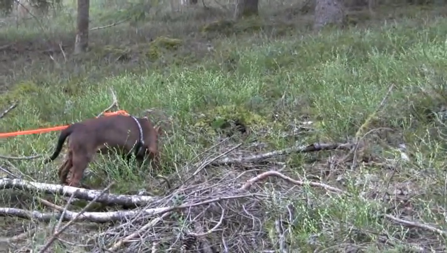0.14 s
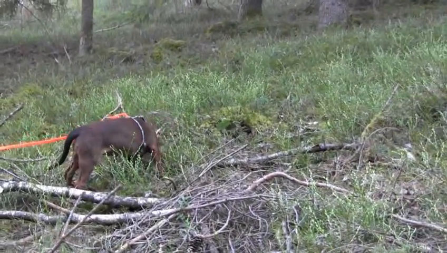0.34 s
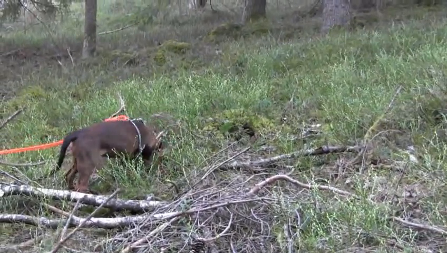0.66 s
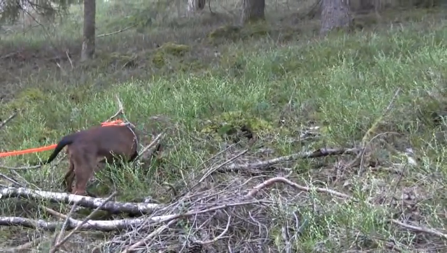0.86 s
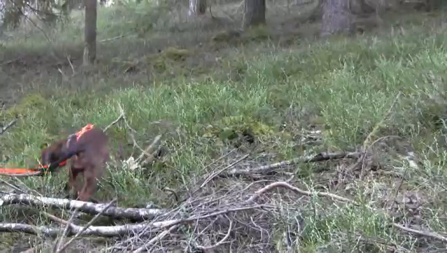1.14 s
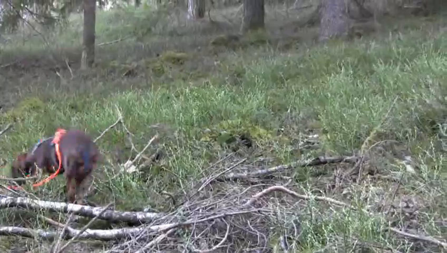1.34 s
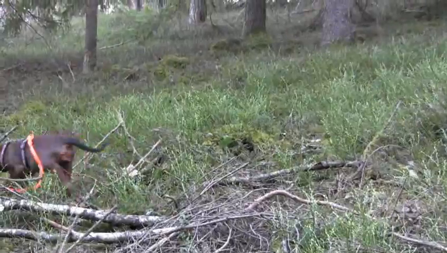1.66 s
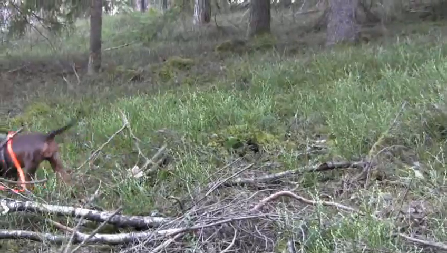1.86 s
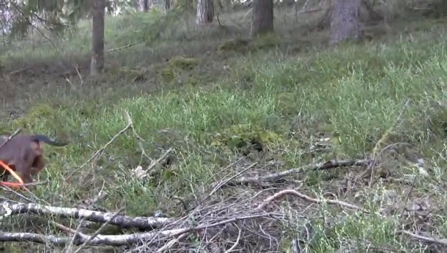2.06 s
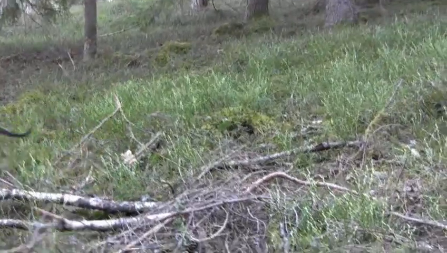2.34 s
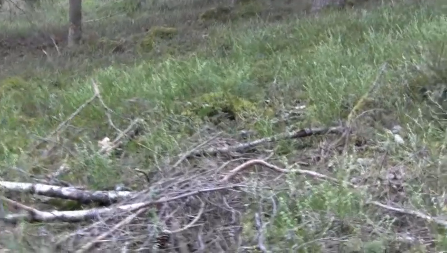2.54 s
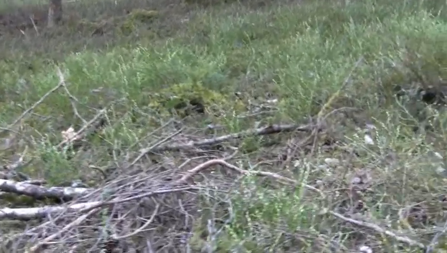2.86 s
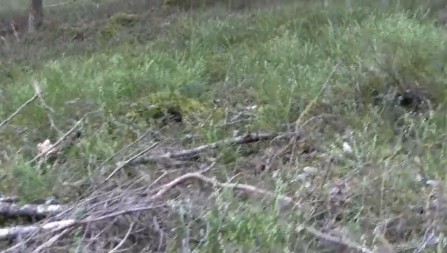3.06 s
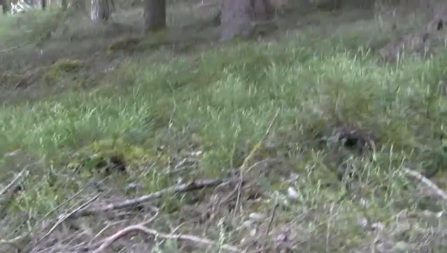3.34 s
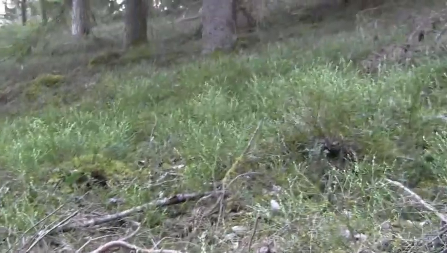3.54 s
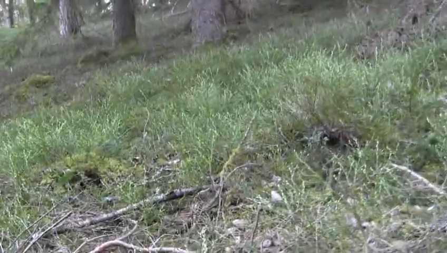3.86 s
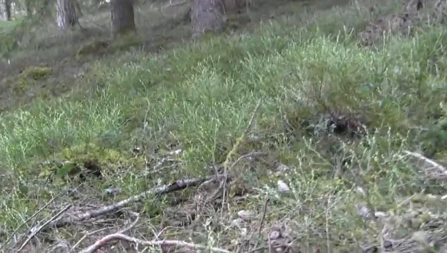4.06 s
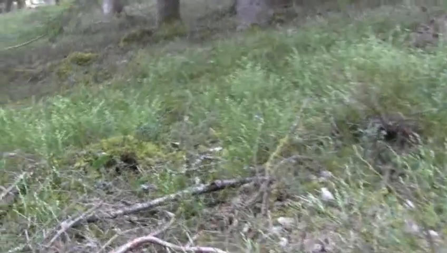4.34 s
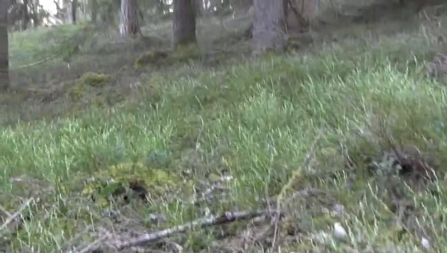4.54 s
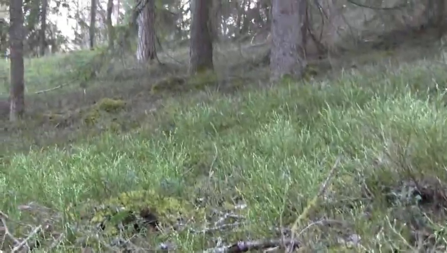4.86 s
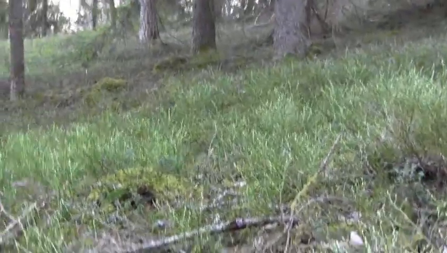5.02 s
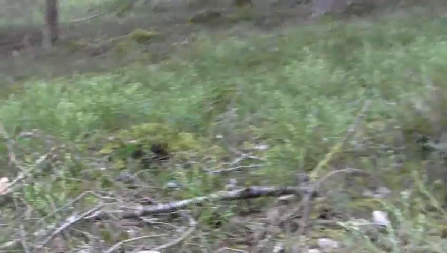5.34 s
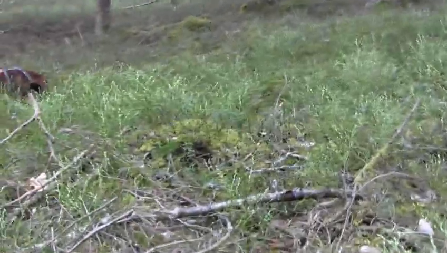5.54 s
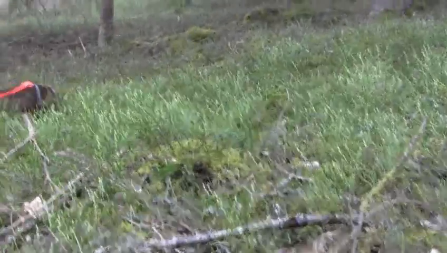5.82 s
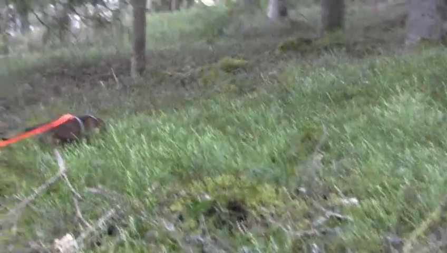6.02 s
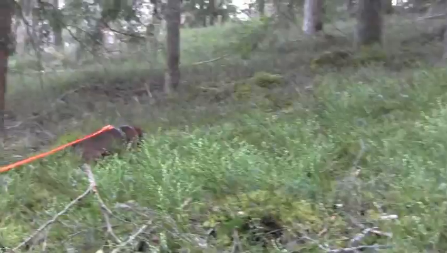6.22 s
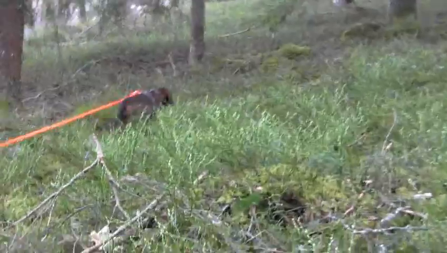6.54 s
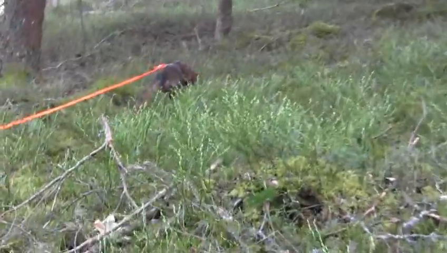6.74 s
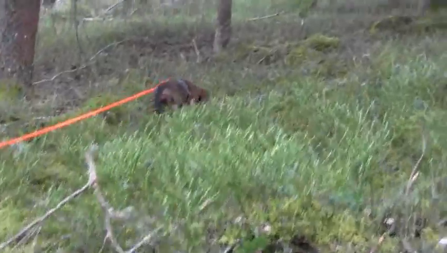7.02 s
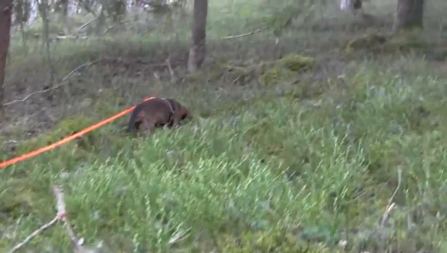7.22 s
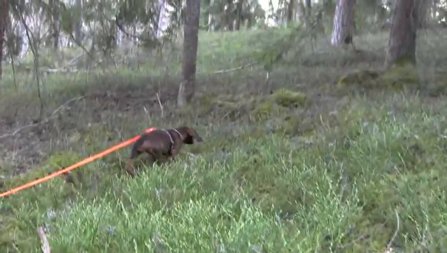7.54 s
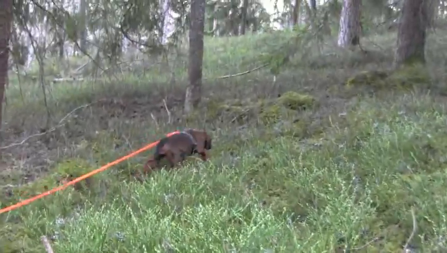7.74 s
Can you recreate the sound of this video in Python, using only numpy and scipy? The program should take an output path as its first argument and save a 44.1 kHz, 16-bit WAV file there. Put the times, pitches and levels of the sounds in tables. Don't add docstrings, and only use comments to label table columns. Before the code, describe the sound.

A dry, close outdoor stereo pickup in still woods with soft air hiss. From 0 to 0.5 s, a dog pushes gently through grass: soft swishes, small dull knocks, faint whistling whisks of the lead and a short rip. From 0.5 to 2 s it is very quiet, with a faint distant road hum and tiny dry ticks. At 2-2.9 s steps begin, with brush swishing and twigs snapping, a sharp crack at 2.58. Sparse rustles follow, then a firm crack and crunch at 3.6. From 4 to 5.4 s snaps thicken, strongest around 4.55-4.8, with a brushy crunch at 5.06. More cracks come at 5.75-5.9, then a heavy splintering crunch at 6.06-6.13. Dense bright crackling runs 6.5-7.15, peaking near 6.9. It thins briefly, then a hard snap at 7.7 and rustling crackles close it. Low handling bumps recur.

```python
import sys
import numpy as np
from scipy import signal
from scipy.fft import rfft, irfft, next_fast_len
from scipy.io import wavfile
from scipy.ndimage import uniform_filter1d

SR = 44100
rng = np.random.default_rng(int(sys.argv[2]) if len(sys.argv) > 2 else 0)


def voltage_ratio(decibels):
    exponent = np.asarray(decibels, float) / 20
    return 10 ** exponent


def generate_wav(signal):
    frames = np.transpose(np.atleast_2d(signal))
    scaled = np.clip(frames, -1, 1) * 32767
    pcm = np.round(scaled).astype(np.int16)
    wavfile.write(sys.argv[1], SR, pcm)


N = 347830


def snap(energy_db, ring_hz, edge_db, knock_db, tear_ms):
    t = np.arange(2048) / SR
    tear_s = np.clip(tear_ms, .15, 14) / 1000
    fibres = rng.standard_normal(2048) * np.minimum(t / .0003, 1) * np.exp(-t / tear_s)
    fibres[12] -= 1.1
    fibres += 0.034 * rng.standard_normal(2048) * np.exp(-t / 0.0038)

    top_hz = np.clip(7500 * voltage_ratio(0.1 * (edge_db + 1.5)), 3000, 8500)
    body = signal.sosfilt(signal.butter(2, [1000, top_hz], "band", fs=SR, output="sos"), fibres)
    edge = signal.sosfilt(signal.butter(2, [6300, 12800], "band", fs=SR, output="sos"), fibres)
    mode = np.exp(-t * ring_hz / 1.18) * np.sin(2 * np.pi * ring_hz * t)
    ring = signal.oaconvolve(fibres, mode)[:2048]

    knock_hz = 280 * 1.53 ** rng.random()
    knock = np.sin(2 * np.pi * knock_hz * t) * np.exp(-t * knock_hz / 0.33)
    knock *= np.minimum(t / 0.00061, 1)
    knock = signal.sosfilt(signal.butter(3, 150, "high", fs=SR, output="sos"), knock)

    sound = evened(evened(body) + 1.6 * evened(ring))
    sound = sound + voltage_ratio(edge_db) * evened(edge) + voltage_ratio(knock_db) * evened(knock)
    lag = np.clip(2.0 * rng.standard_normal(), -.75, .75)
    return voltage_ratio(energy_db) / np.sqrt(2048) * ports(np.roll(sound, 2), lag, 0.48)


def crunch(energy_db, ring_hz, cycles):
    t = np.arange(2048) / SR
    ring = np.sin(2 * np.pi * ring_hz * t) * np.exp(-t * ring_hz / cycles) * np.minimum(t / 0.00081, 1)
    return voltage_ratio(energy_db) * ring / np.linalg.norm(ring)


# (time [s], energy [dB], ring [Hz], sharp edge [dB])
CLEAN_BREAKS = [(.2486, -34, 3300, -20), (.312, -29, 2570, -33), (1.5834, -33, 4430, -1.5),
                (2.6516, -24.5, 2200, -29), (2.7732, -20, 1010, -18), (2.8278, -19.5, 5550, 0),
                (3.6113, -27, 4450, -24), (4.2843, -24, 2660, -16), (4.308, -20.5, 2850, -19),
                (4.5466, -14.5, 3460, -25), (4.7791, -10.5, 1590, -2.5), (4.783, -17, 2650, -14),
                (5.0790, -16.5, 2330, -15), (5.088, -21, 1230, -15), (5.2587, -27, 2110, -3),
                (5.2935, -21, 2000, -13), (5.361, -20.5, 7630, -3), (5.8204, -24, 6370, 6),
                (5.8257, -17.5, 3330, -27), (5.9071, -12.5, 960, -11), (6.48, -22, 4960, 7),
                (6.5286, -23, 2240, -5), (6.6112, -20.5, 5800, -5), (6.6675, -20.5, 5450, -6),
                (6.7282, -13.5, 5250, -6), (6.9079, -22, 5860, -20), (7.2568, -29, 2600, -23),
                (7.7033, -8, 6000, -18), (7.829, -20.5, 6070, -23)]
# (time [s], energy [dB], ring [Hz], sharp edge [dB])
SPLINTERS = [(2.3474, -26.5, 2220, -60), (2.547, -32, 5940, -9), (2.5784, -11.5, 5750, -15),
             (2.6822, -21, 1860, -19), (3.176, -26, 5900, 0), (3.2533, -31, 5160, 1),
             (3.3114, -31, 7940, -9), (3.9326, -24.5, 4360, -12), (4.0500, -19.5, 1880, -40),
             (4.1472, -21.5, 1700, -18), (4.7203, -18, 2930, -2.5), (5.3904, -25.5, 2000, -16),
             (5.604, -21, 2030, -39), (5.7493, -14, 6950, -12), (5.7756, -16, 6900, -16),
             (1.5555, -33, 8400, -8), (6.7901, -21.5, 5900, -1), (1.347, -34, 8100, -14),
             (6.88, -13, 2300, -23), (6.934, -14, 6140, -14), (7.645, -21.5, 6120, -3),
             (7.758, -23.5, 3700, -11), (7.7928, -30, 1490, 7), (7.839, -27, 4870, -22)]
# (time [s], energy [dB], ring [Hz], sharp edge [dB])
PRESSED = [(2.0294, -26, 2270, -30), (2.8619, -21, 1020, -19), (3.5042, -26, 3230, -26),
           (4.2798, -22, 4600, 2.5), (4.3717, -25.5, 2310, -10), (4.7764, -12, 7560, 2.5),
           (5.3262, -23.5, 2520, -15), (5.6275, -29, 1550, -12), (6.3412, -30, 4270, -6),
           (6.6836, -36, 7100, -6), (6.7176, -13.5, 4570, -1.5), (6.762, -20, 2120, -20),
           (6.8878, -15, 3200, -4), (6.8933, -7.5, 3180, -20), (7.155, -13, 3420, -5.5)]
# (time [s], energy [dB], ring [Hz], sharp edge [dB])
TRODDEN = [(2.7961, -16, 1990, -23), (3.594, -13.5, 4630, -7), (4.1346, -19.5, 960, -46),
           (4.139, -21, 4160, -21), (4.5698, -15, 1800, -7.5), (4.6652, -16, 6340, 0.5),
           (4.6939, -15, 2600, -2), (4.7652, -22.5, 6200, -9), (5.2218, -23, 4330, -3.5),
           (5.4675, -29, 4030, -6), (5.756, -16.5, 2840, -28), (5.7813, -18, 2800, -6),
           (6.0788, -22, 2940, -15), (7.0022, -18.5, 2920, -19), (7.046, -17.5, 910, -20),
           (7.0995, -20.5, 920, -16), (7.7151, -26, 5640, -9)]
# (time [s], energy [dB], ring [Hz], sharp edge [dB])
RIPS = [(.414, -26.5, 2000, -27), (.431, -27.5, 3070, -13), (1.396, -36.5, 6000, -8),
        (1.478, -30.5, 3500, -14), (1.455, -34.5, 3300, -16), (2.203, -25.5, 1500, -24),
        (2.258, -25, 1880, -17), (2.29, -30, 1300, -18), (3.33, -27, 2160, -44), (3.912, -25.5, 1850, -36),
        (4.967, -28, 2420, -28), (6.268, -20.5, 3100, -14), (7.635, -25, 5500, -8)]
# (time [s], energy [dB], ring [Hz])
CRUNCHES = [(.081, -36, 383), (.136, -36, 316), (2.5787, -13.5, 1470), (3.596, -12, 1330),
            (4.571, -16, 400), (4.6955, -17.5, 2520), (5.043, -19, 1930), (5.058, -24, 1050),
            (6.051, -23, 482), (6.060, -13.5, 715), (6.0628, -22, 720), (6.0692, -20, 1020),
            (6.0790, -15.5, 690), (6.082, -19, 386), (6.094, -20, 650), (6.102, -20, 700),
            (6.1265, -19.5, 696), (6.824, -20, 1150), (6.8937, -11, 6170), (7.1551, -15, 3470),
            (7.156, -18.5, 1180)]


def twigs():
    out = np.zeros((2, N + 2048))
    # (breaks, low knock [dB], tearing time [ms])
    kinds = [(CLEAN_BREAKS, -15.5, 0.69), (SPLINTERS, -33, 1.9), (PRESSED, -7, 0.33),
             (TRODDEN, -1.2, 1.74), (RIPS, -16.5, 9.5)]
    for breaks, knock_db, tear_ms in kinds:
        for s, *twig in breaks:
            place(out, s, snap(*twig, knock_db, tear_ms))
    for s, *wood in CRUNCHES:
        place(out, s, crunch(*wood, cycles=1.47))
    return out[:, :N]


def tick(energy_db, ring_hz):
    t = np.arange(2048) / SR
    fibres = .5 * rng.standard_normal(2048) * np.exp(-t / 0.00048)
    fibres[0] -= 1.3
    click = signal.sosfilt(signal.butter(2, [1800, 11000], "band", fs=SR, output="sos"), fibres)
    mode = np.exp(-t * ring_hz / 1.5) * np.sin(2 * np.pi * ring_hz * t)
    ring = signal.oaconvolve(fibres, mode)[:2048]
    sound = evened(0.63 * evened(click) + evened(ring))
    lag = np.clip(0.92 * rng.standard_normal(), -.75, .75)
    return voltage_ratio(energy_db) / np.sqrt(2048) * ports(np.roll(sound, 2), lag, 0.13)


# (time [s], energy [dB], ring [Hz])
KNOCKS = [(0.079, -37, 443), (0.1328, -30.5, 450), (0.3147, -36, 1950), (2.0299, -27, 2340),
          (2.174, -34, 600), (2.192, -32, 1490), (2.22, -31, 1160), (2.2267, -33, 1420), (2.281, -31, 1200),
          (2.296, -37, 1290), (2.314, -29, 1350), (2.329, -34, 1600), (2.337, -32, 450), (2.355, -35, 500),
          (2.385, -30, 730), (2.548, -33, 1200), (2.725, -36, 560), (2.781, -28, 1990), (2.9617, -34, 1500),
          (2.9959, -36, 1230), (3.176, -37, 1930), (3.255, -34, 1190), (3.5315, -30, 473),
          (3.621, -32, 1720), (3.6265, -33, 1530), (3.7781, -36, 1090), (4.0045, -23, 920),
          (4.1351, -28, 780), (4.2795, -31, 1740), (4.3715, -19.5, 1500), (4.7888, -31.0, 900),
          (4.829, -36, 1230), (4.998, -26, 1100), (5.032, -23, 1160), (5.0879, -34, 1300),
          (5.4219, -34.0, 1590), (5.6263, -27.5, 1770), (5.746, -35, 1870), (5.7807, -23, 1760),
          (5.796, -27.5, 1140), (6.2783, -25, 1440), (6.3869, -29, 1380), (6.5455, -28, 1440),
          (6.575, -31.5, 1340), (6.5967, -33, 1430), (6.667, -34, 2050), (6.6843, -30, 1770),
          (6.7207, -24, 1420), (7.059, -33.5, 2110), (7.0998, -29, 600), (7.117, -27, 1530),
          (7.345, -29, 796), (7.4079, -32.5, 790), (7.5186, -33, 690), (7.567, -33.0, 1270),
          (7.6219, -30.5, 1230), (7.7149, -26, 950), (7.8379, -29, 1550)]
# (time [s], energy [dB], ring [Hz])
OVERTONES = [(0.2493, -42, 5400), (2.5785, -12.5, 5100), (2.5794, -17, 6450), (5.9078, -18.5, 2400),
             (7.1553, -35, 1900), (2.7965, -36, 4760), (7.046, -27.5, 1490), (7.2568, -25, 2280),
             (2.579, -18, 7700), (2.7973, -32, 3200), (2.796, -20, 8330), (3.5946, -21, 6640),
             (4.139, -22.5, 1770), (4.28, -29.5, 1900), (4.373, -23.5, 735), (4.57, -16, 1870),
             (4.5704, -20, 7650), (4.6667, -23, 1830), (4.695, -27, 5300), (4.7208, -27, 6800),
             (4.778, -19, 5160), (4.7796, -15.5, 1830), (5.0616, -21, 5400), (5.2214, -31, 7050),
             (5.7554, -20.5, 7600), (5.7565, -23, 850), (5.907, -27, 9200), (6.719, -24, 1800),
             (6.8802, -21, 6170), (6.8815, -16, 1250), (7.0025, -25, 5960), (7.0027, -36, 3150),
             (7.1557, -24.5, 7160)]
# (time [s], energy [dB], ring [Hz])
TICKS = [(0.3162, -33.5, 3750), (0.4184, -28, 2520), (0.9048, -47.5, 3270), (1.087, -42, 8550),
         (1.359, -44, 9500), (1.425, -41, 9000), (1.57, -45, 9000), (1.6572, -36.5, 7400),
         (1.866, -41, 4200), (1.8826, -42, 2560), (2.035, -36.5, 4330), (2.2583, -32, 5770),
         (2.2822, -33, 5020), (2.4513, -34.5, 2860), (2.5484, -33, 7800), (2.7533, -32, 4930),
         (2.7961, -17, 3730), (3.2333, -38, 5880), (3.5184, -39, 2690), (3.5332, -28, 2800),
         (3.5437, -37.0, 2670), (3.9174, -28, 3270), (4.048, -25, 4260), (4.131, -35, 2070),
         (4.304, -29, 2820), (4.4914, -27.5, 7620), (4.5828, -20, 5100), (4.658, -31, 4480),
         (4.6655, -17.5, 6800), (4.7417, -28, 4290), (4.7808, -12.5, 11400), (4.8554, -27.5, 3160),
         (5.088, -22, 2480), (5.125, -32, 2860), (5.286, -29, 3980), (5.294, -22.5, 2880),
         (5.3657, -26, 3770), (5.3906, -30, 3320), (5.454, -30, 3500), (5.4744, -28, 3270),
         (5.566, -29, 4570), (6.2906, -35, 3540), (6.3442, -25, 6700), (6.5185, -28, 3010),
         (6.529, -21.5, 4890), (6.5949, -29, 2070), (6.6333, -25, 4540), (6.639, -22, 7150),
         (6.685, -23, 7040), (6.783, -26, 7540), (6.7902, -20.5, 2070), (6.8535, -26, 6400),
         (6.866, -21, 2710), (6.8794, -18, 6500), (7.002, -27, 2860), (7.0592, -32, 4570),
         (7.274, -35.5, 7110), (7.6164, -29, 5730), (7.661, -24.5, 6500), (7.7582, -22, 3340)]


def litter():
    out = np.zeros((2, N + 2048))
    for s, *stick in KNOCKS + OVERTONES:
        side_db = 1.2 * rng.standard_normal() * np.array([[1], [-1]])
        place(out, s, crunch(*stick, cycles=1.28) * voltage_ratio(side_db))
    for s, *stalk in TICKS:
        place(out, s, tick(*stalk))
    return out[:, :N]


# (frequency [Hz], level [dB])
STEMS = [(200, -38), (900, -4.5), (1400, -1.5), (3000, -2), (4500, -7.5), (6000, -11.5), (9000, -48.5),
         (14000, -79)]
# (frequency [Hz], level [dB])
TIPS = [(2000, -40.5), (4500, -1), (6500, 8), (9000, 6), (12800, 2), (14000, 5), (16500, -15)]
# (frequency [Hz], level [dB])
GROUND = [(50, -40.5), (130, -3), (220, 2.5), (500, 5), (900, 7), (3000, -45.5)]
# (time [s], peak [dB], rise [s], fall [s], dry tips [dB])
NOSING = [
    (.035, -67, .008, .2, 0),
    (.2, -61, .3, .3, -18),
    (.425, -57, .03, .11, -8),
    (1.09, -72, .02, .3, -1),
    (1.2, -70, .06, .2, -1),
    (1.477, -66, .06, .3, -4),
    (2.023, -66, .2, .06, -3),
]
# (time [s], peak [dB], rise [s], fall [s], dry tips [dB])
SWEEPS = [(2.171, -58.5, 0.053, 0.15, -7), (2.274, -57.5, 0.087, 0.55, -10),
          (2.674, -58, 0.055, 0.084, -5.5), (2.784, -60, 0.077, 0.29, -10),
          (3.119, -59.5, 0.27, 0.065, -7.5), (3.475, -59, 0.34, 0.2, -11), (3.7, -60.5, 0.12, 0.06, -10),
          (3.816, -58.5, 0.14, 0.059, -9.5), (3.95, -49.5, 0.053, 0.12, -7.5),
          (4.254, -58, 0.22, 0.053, -7), (4.569, -46.5, 0.1, 0.037, -6), (4.76, -59.5, 0.64, 0.32, -8),
          (4.975, -49, 0.018, 0.13, -12.5), (5.06, -41.5, 0.044, 0.045, -5), (5.32, -53, 0.044, 0.11, -4),
          (5.56, -53.5, 0.2, 0.071, -5), (5.71, -46.5, 0.094, 0.14, -7.5), (5.97, -51, 0.17, 0.15, -9.5),
          (6.082, -39, 0.02, 0.027, -14.5), (6.5, -47.5, 0.15, 0.048, -4), (6.6, -48.5, 0.017, 0.23, -1),
          (6.737, -48, 0.077, 0.17, -2.5), (6.87, -53, 0.15, 0.27, -8.5), (7.688, -48.5, 0.06, 0.14, -3),
          (7.841, -44.5, 0.063, 0.4, -6.5)]
# (time [s], peak [dB], rise [s], fall [s])
TREADS = [(.074, -62, 0.092, 1), (.44, -66, .07, .1), (.9, -68, 0.074, 0.46), (1.2, -70, 0.48, 0.59),
          (2.2, -72, .1, 0.74), (2.46, -63, 1, 0.13), (2.674, -62.5, 0.15, 0.18), (3.12, -63, 0.42, 0.081),
          (3.475, -61, 0.61, .25), (3.71, -57.5, 0.1, 0.18), (3.99, -51.5, 0.072, 0.097),
          (4.298, -60, 0.15, 0.15), (4.569, -53.5, 0.14, 0.067), (4.781, -62, .5, 0.087),
          (5.064, -51.5, 0.1, 0.06), (5.72, -55.5, 0.28, 0.12), (5.93, -58, 0.19, 0.31),
          (6.086, -40, 0.026, 0.025), (6.5, -55.5, 0.12, 0.12), (6.71, -55, 0.11, 0.54),
          (6.886, -51.5, 0.11, 0.11), (7.688, -51.5, 0.038, 0.061), (7.841, -47, 0.05, 0.11)]


def brush():
    swish = hiss(1.5, 1.8, 1)
    fine = crackle(1700, 2.9, 700, 11700, cycles=1.5)
    coarse = crackle(150, 0.49, 133.0, 810, cycles=1.0)
    bent = [(s, db, rise, fall) for s, db, rise, fall, dry_db in NOSING + SWEEPS]
    scraped = [(s, db + dry_db, rise, fall) for s, db, rise, fall, dry_db in NOSING + SWEEPS]
    stems = evened(coloured(swish + 0.7 * fine, STEMS)) * strokes(bent, 0)
    tips = evened(coloured(swish + 1.3 * fine, TIPS)) * strokes(scraped, stir_db=-9)
    ground = evened(coloured(swish + 0.22 * coarse, GROUND)) * strokes(TREADS, stir_db=-4.5)
    return stems + tips + ground


def crackle(per_s, spread_db, low_hz, high_hz, cycles):
    clumps = voltage_ratio(5.5 * evened(uniform_filter1d(rng.standard_normal(N), size=900)))
    size = voltage_ratio(spread_db * np.minimum(rng.exponential(1, N), 3.6))
    size *= rng.random(N) < per_s / SR * clumps
    family = rng.integers(0, 16, N)
    t = np.arange(1024) / SR
    out = np.zeros((2, N))
    for k, hz in enumerate(np.geomspace(low_hz, high_hz, num=16)):
        ring = np.exp(-t * hz / cycles) * np.sin(2 * np.pi * hz * t) * np.sqrt(hz)
        ring *= 1
        ring = np.exp(-t * hz / cycles) * np.sin(2 * np.pi * hz * t + 1.27) * np.sqrt(hz)
        pair = ports(np.roll(ring, 8), 0.41 * rng.standard_normal(), 0.07)
        out += signal.oaconvolve((size * (family == k))[None], pair, axes=1)[:, :N]
    return evened(out)


# (time [s], level [dB])
STIR = [(0, -85), (.9, -74), (2, -74), (3.2, -73.5), (4.9, -62.5), (6.2, -58.5), (7.1, -71), (7.35, -62.5),
        (7.59, -59), (7.625, -52), (7.9, -64)]


def strokes(rows, stir_db):
    s, peak_db, rise, fall = np.transpose(rows)[:, :, None]
    t = np.arange(0, N, 64) / SR - s
    below = np.where(t < 0, -t / rise, t / fall)
    power = voltage_ratio(2 * peak_db - 20 * below).sum(axis=0)
    stir_power = voltage_ratio(2 * (curve(STIR, count=1) + stir_db))
    return np.sqrt(np.repeat(power, 64)[:N] + stir_power)


# (start [s], length [s], start pitch [Hz], end pitch [Hz], level [dB])
WHISKS = [
    (.092, .022, 2500, 2400, -64),
    (.148, .032, 1650, 1400, -65.5),
    (.278, .035, 3450, 3900, -68),
    (.315, .028, 2280, 1930, -66),
]


def lead():
    out = np.zeros(N)
    for s, length, from_hz, to_hz, level_db in WHISKS:
        air = rng.standard_normal((2, 8192))
        u = np.arange(round(length * SR)) / (length * SR)
        fuzz = uniform_filter1d(uniform_filter1d(air, size=200), size=200)[:, :len(u)]
        phase = 2 * np.pi * np.cumsum(from_hz * (to_hz / from_hz) ** u) / SR
        whistle = evened(fuzz[0] * np.cos(phase) + fuzz[1] * np.sin(phase))
        swell = np.sqrt(abs(np.sin(np.pi * u)))
        out[round(s * SR):][:len(u)] += voltage_ratio(level_db) * swell * whistle
    return out


# (frequency [Hz], level [dB])
JOLT = [(20, -8), (60, 15), (110, 20.5), (300, -74)]
# (time [s], peak [dB], fade [s])
JOLTS = [(.25, -70, 0.03), (.5, -66, 0.034), (1.61, -69, .03), (2, -70, 0.024), (2.75, -61.5, 0.12),
         (3.1, -74, .06), (4.68, -69, 0.17), (4.95, -67, .05), (5.45, -63, 0.16), (6.1, -60, 0.056),
         (6.48, -64.5, 0.13), (6.9, -67, 0.27), (7.72, -68, 0.15)]


def grip():
    shared, own = rng.standard_normal(N), rng.standard_normal((2, N))
    lumps = voltage_ratio(2.5 * evened(uniform_filter1d(rng.standard_normal(N), size=2500)))
    shifts = strokes([(s, db, fade, fade) for s, db, fade in JOLTS], stir_db=-36)
    return evened(coloured((0.9 * shared + 2 * own) * lumps, JOLT)) * shifts * voltage_ratio(-2)


# (time [s], level [dB], centre [Hz])
ROAD = [
    (0, -84, 900),
    (.55, -66.5, 940),
    (1.0, -66.5, 950),
    (1.3, -69, 940),
    (1.6, -66.5, 1050),
    (2.2, -92, 940),
    (7.9, -78, 937),
]


def road():
    turn = np.exp(2j * np.pi * np.cumsum(curve(ROAD, count=2)) / SR)
    r = np.exp(-np.pi * 115. / SR)
    slow = hiss(.5, 0.2, 1.2) / turn
    for _ in range(2):
        slow = signal.lfilter([1 - r], [1, -r], slow)
    return voltage_ratio(curve(ROAD, count=1)) * evened((turn * slow).real)


# (frequency [Hz], level [dB])
WOODS = [(35, -70), (60, -19), (118, -7), (673, -5), (976, -2.5), (1700, -11), (11200, -46.5), (15500, -61)]


def woods():
    return voltage_ratio(-67) * evened(coloured(hiss(1.4, 0.2, 2.4), WOODS))


# (frequency [Hz], coherence [0 to 1])
SAME = [(60, 1), (240, 0.76), (950, 0.94), (3770, 0.63), (15000, 0.51)]


def hiss(patchy_db, flicker_db, width):
    frames = N // 128 + 6
    a, b, c, d, patches = rng.standard_normal((frames, 257, 5)).T
    patches = evened(uniform_filter1d(uniform_filter1d(patches, size=8, axis=0), size=12, axis=1))
    flicker = signal.lfilter([1], [1, -.7], rng.exponential(1, frames) ** 2 - 2)
    hz = np.fft.rfftfreq(512, 1 / SR)
    same = np.clip(read(SAME, hz), 0, 1)[:, None] ** width
    left = a + 1j * b
    z = np.array([left, same * left + np.sqrt(1 - same ** 2) * (c + 1j * d)])
    z *= voltage_ratio(patchy_db * patches + flicker_db * np.minimum(evened(flicker), 3))
    return evened(signal.istft(z, nperseg=512, noverlap=384)[1][:, :N])


def ports(mono, lag, scatter):
    hz = np.fft.rfftfreq(len(mono), 1 / SR)
    turn = np.exp(1j * np.pi * hz / SR * lag * np.array([[1], [-1]]))
    near = rng.standard_normal((2, 160)) * np.exp(-np.arange(160) / 34.0)
    near = rfft(near / np.linalg.norm(near[0]), len(mono)) * scatter * hz / (hz + 5000)
    return irfft(rfft(mono) * (turn + near), len(mono))


def coloured(x, points):
    log_gain = np.log(voltage_ratio(read(points, abs(np.fft.fftfreq(4096, 1 / SR)))))
    taps = np.fft.ifft(np.exp(np.conj(signal.hilbert(log_gain)))).real[:2048]
    return signal.oaconvolve(x, taps[None], axes=1)[:, :x.shape[1]]


def read(points, hz):
    f, value = np.transpose(points)
    return np.interp(np.log(hz + 1), np.log(f + 1), value)


def curve(rows, count):
    rows = np.array(rows)
    return np.interp(np.arange(N) / SR, rows[:, 0], rows[:, count])


def evened(x):
    return x / np.sqrt(np.mean(x ** 2) + 1e-20)


def place(out, s, sound):
    out[:, round(s * SR):][:, :2048] += sound


def scene():
    return twigs() + litter() + brush() + lead() + grip() + road() + woods()


def top_cut(x):
    return signal.sosfilt(signal.butter(12, 16660, fs=SR, output="sos"), x)


# (frequency [Hz], gain [dB])
MICROPHONE = [(15, -28), (60, -9.5), (150, -4.5), (13000, 3), (14500, -7.5), (16400, -15), (16900, -49)]
# (frequency [Hz], difference [dB])
LEAN = [(60, -.5), (240, .5), (950, 1.2), (3770, 0.7), (15000, 1.2)]


def record(dry):
    size = next_fast_len(N, True)
    lean = voltage_ratio(read(LEAN, np.fft.rfftfreq(size, 1 / SR)) * np.array([[.5], [-.5]]))
    leaning = irfft(rfft(dry, size) * lean, size)[:, :N]
    mix = coloured(leaning, MICROPHONE)
    return top_cut(mix)


dry = scene()
out = record(dry)
generate_wav(out)
```